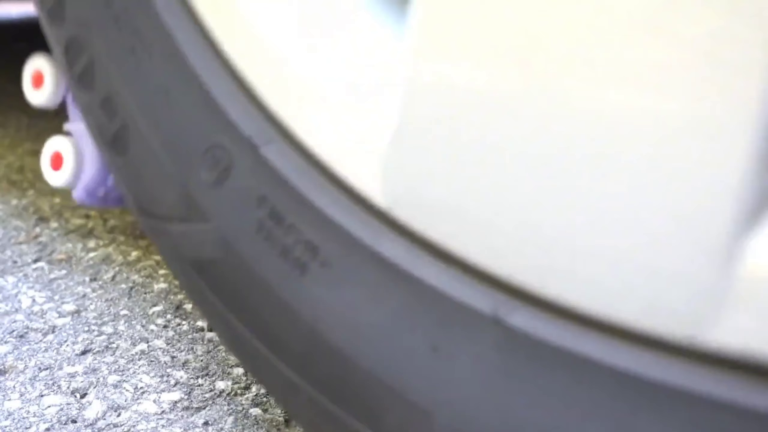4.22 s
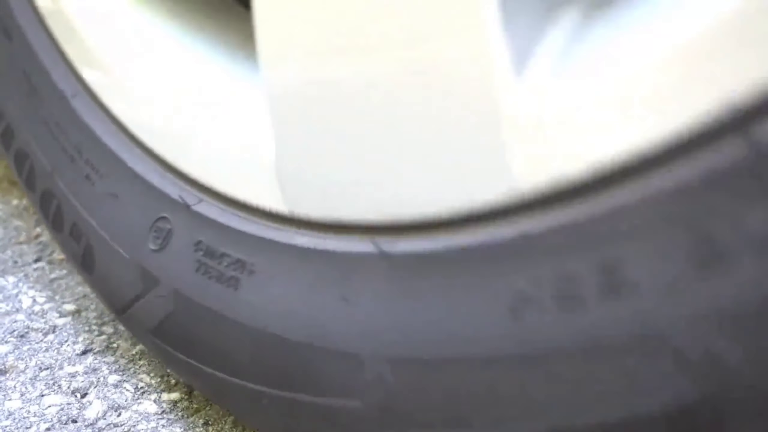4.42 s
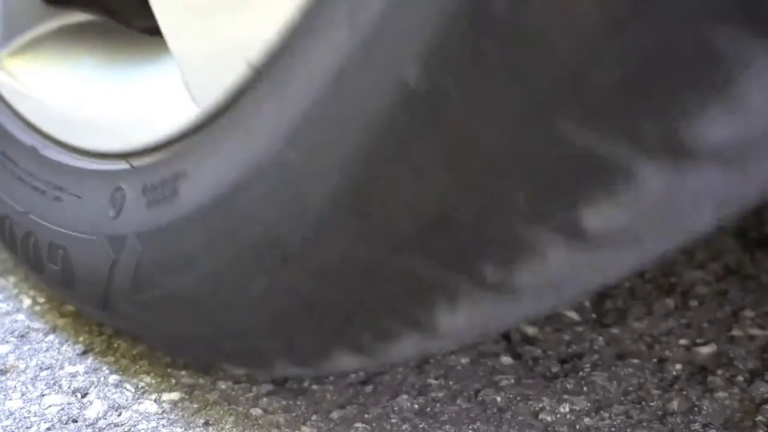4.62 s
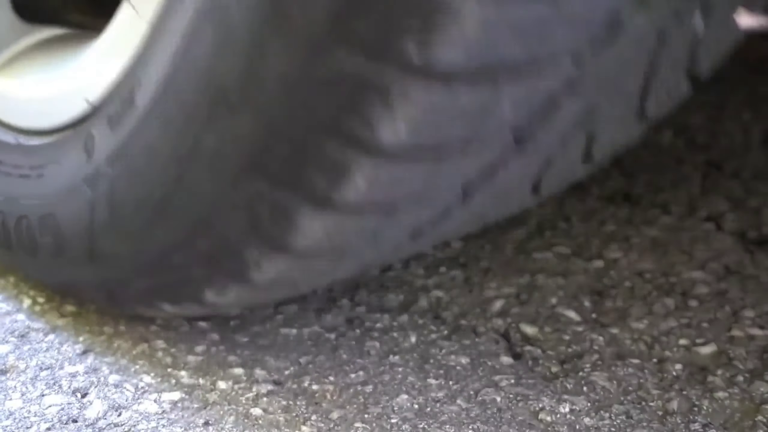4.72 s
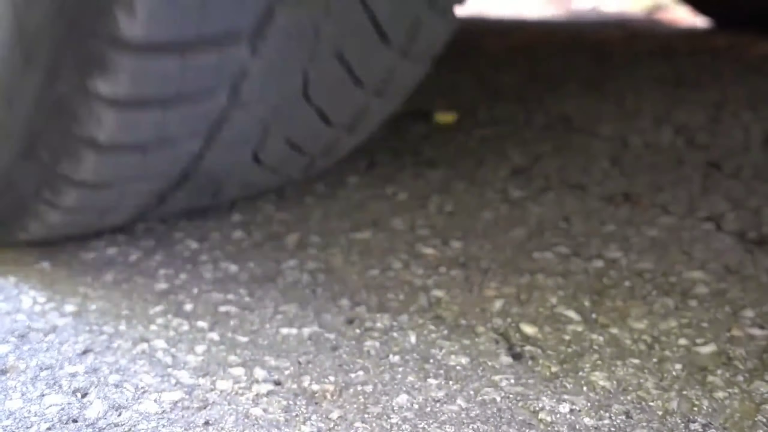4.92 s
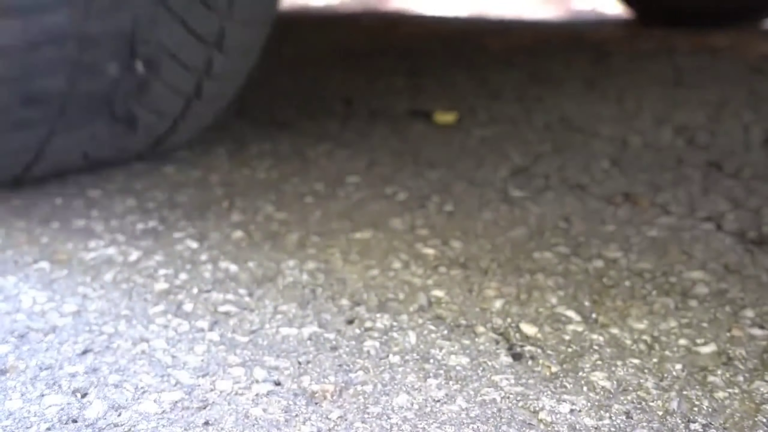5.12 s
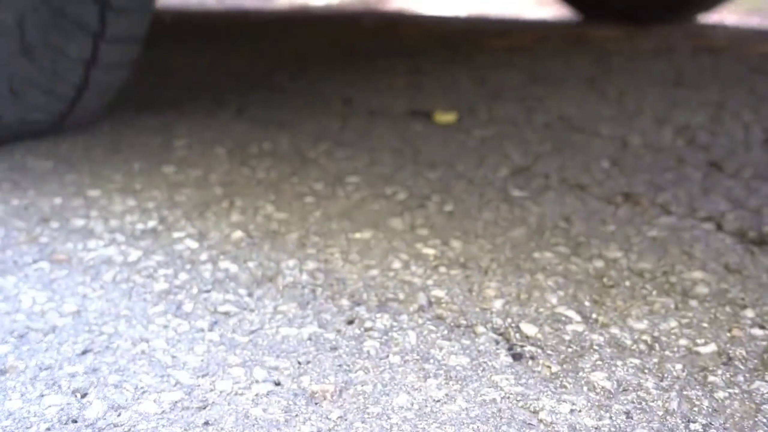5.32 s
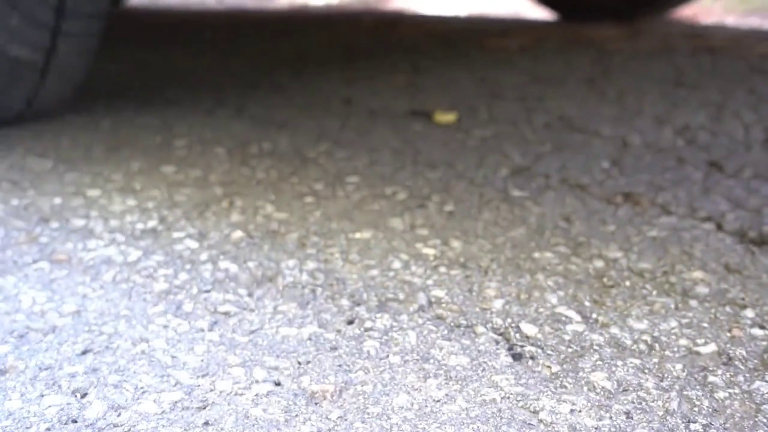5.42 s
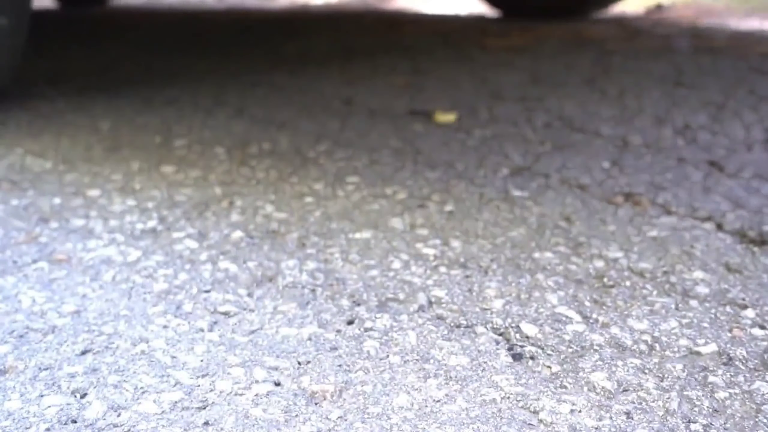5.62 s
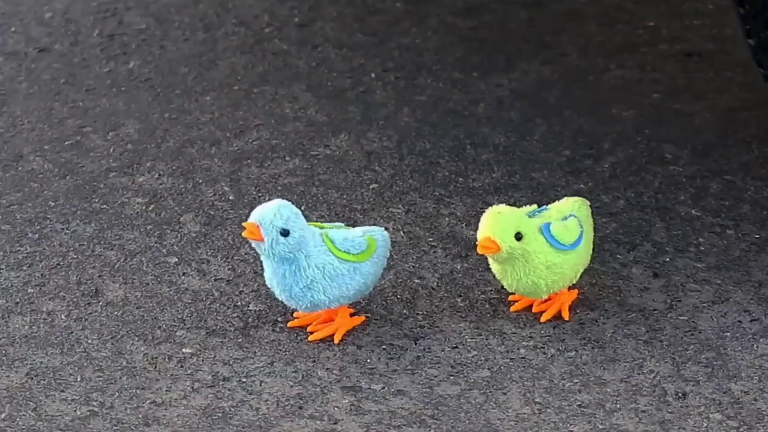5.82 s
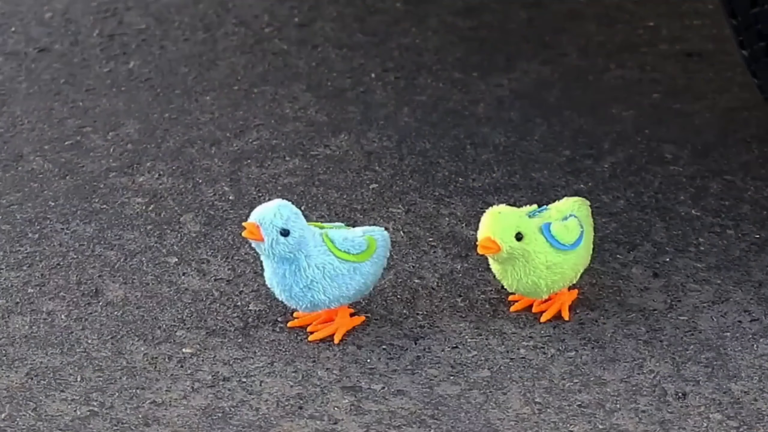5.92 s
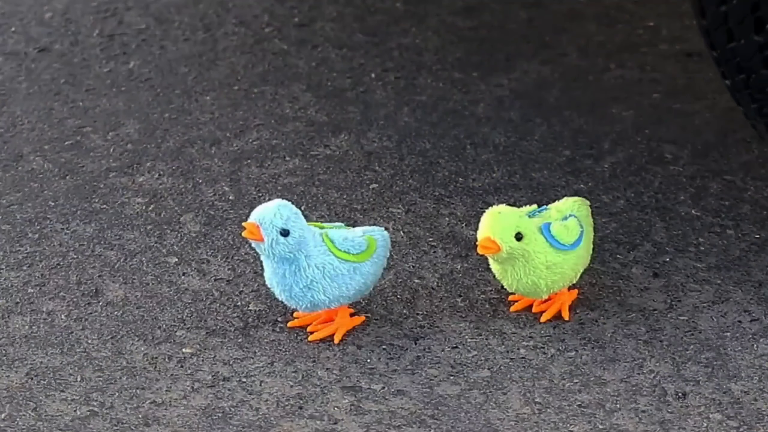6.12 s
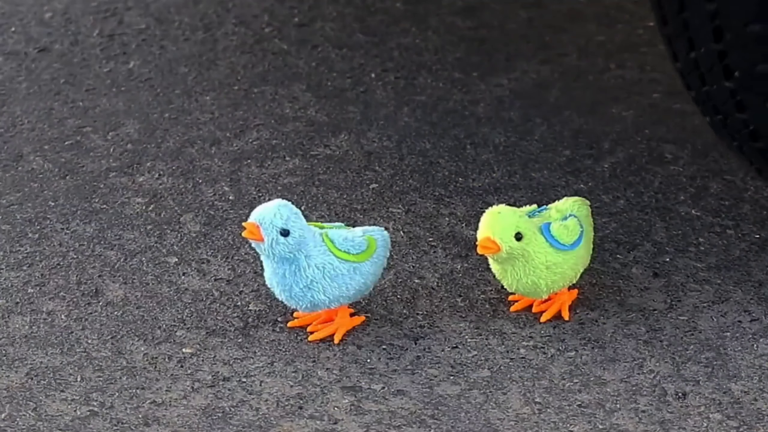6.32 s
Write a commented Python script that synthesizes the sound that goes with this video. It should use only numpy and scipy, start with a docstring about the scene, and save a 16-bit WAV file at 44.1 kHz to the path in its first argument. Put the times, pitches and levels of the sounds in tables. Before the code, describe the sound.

Close to the asphalt, a car idles with a low throb. A tyre squeezes a hard plastic toy: dull knocks, then a dense burst of loud snaps and grinding splinters that thins to stray ticks. After a cut without engine, a second toy breaks in separate crunches, with hollow tyre booms and a final overloaded thump. Brief silence, then faint outdoor air and wind.

```python
"""Car creeping over plastic toys

On asphalt, a close microphone hears a car crush hard plastic toys: four shots in a row, with a short
silence before the last. An idling engine, summed from orders of its firing rate, throbs under the first
two; shaped noise gives air, road, whines, scrapes and wind. Ringing splinters grind, noise-struck pieces
snap, low modes knock in the shell and ring in the jolted tyre; the loudest cracks overload the microphone."""
import sys
import numpy as np
from scipy import signal
from scipy.io import wavfile
from scipy.ndimage import uniform_filter1d, map_coordinates

SR = 44100
rng = np.random.default_rng(int(sys.argv[2]) if len(sys.argv) > 2 else 0)


def volts_from_decibels(level):
    """Turn decibel levels (scalar or array-like) into linear amplitude factors."""
    exponent = np.asarray(level, float) / 20
    return 10 ** exponent


def master(y):
    """Save y as 16-bit WAV."""
    cut = np.clip(np.atleast_2d(y).T, -1, 1)
    pcm = np.round(cut * 32767)  # scale
    wavfile.write(sys.argv[1], SR, pcm.astype(np.int16))


N = 281358
THIRD_SHOT_S, THIRD_SHOT_END_S = 3.43, 5.728


def read_spectrum(points, hz):
    """Reads a spectrum at the given frequencies, interpolating over log frequency."""
    f, value = np.transpose(points)
    return np.interp(np.log(hz + 1), np.log(f + 1), value)


def evened(x):
    """Scales a sound to rms 1."""
    return x / np.sqrt(np.mean(x ** 2) + 1e-20)


def spread(rows):
    """Gives the start time of a curve and its columns, one value a sample."""
    s, *columns = np.transpose(rows)
    t = np.arange(s[0], s[-1], 1 / SR)
    return s[0], [np.interp(t, s, c) for c in columns]


def add(mix, s, sound):
    """Mixes a sound in at s seconds."""
    part = mix[max(round(s * SR), 0):][:len(sound)]
    part += sound[:len(part)]


def band(x, lo_hz, hi_hz):
    """Band-passes a sound."""
    edges_hz = [lo_hz, min(hi_hz, SR / 2 - 1)]
    return signal.sosfilt(signal.butter(2, edges_hz, "bandpass", fs=SR, output="sos"), x)


def drift(size, per_s):
    """Smooth random wandering of about rms 1, with per_s fresh values a second."""
    knots = rng.standard_normal(100)
    return map_coordinates(knots, [np.arange(size) * per_s / SR], order=2, mode="mirror")


def fades(size, s):
    """Fades in and out, each s seconds long."""
    return signal.windows.tukey(size, min(2 * s * SR / size, 1))


# air, machinery and road, one table a shot; it swells as the wheel rolls by: t/s, level at 300-1500 Hz/dB
AIR = [
    [(0.0, -42.5), (0.53, -43)],
    [(0.54, -45), (1.14, -36), (1.6, -36.5), (2.04, -35), (2.61, -39.5), (3.43, -45)],
    [(3.42, -44.5), (4.2, -39.5), (5.2, -41), (5.34, -26), (5.52, -29), (5.58, -20.5), (5.69, -48),
     (5.72, -58)],
    [(5.86, -83.5), (5.9, -70.5), (5.97, -54.5), (6.38, -53)],
]
# their colour, one table a shot: f/Hz, relative density/(dB per Hz)
AIR_COLOUR = [
    [(18, -24), (30, 3), (167, -8), (228, -17.5), (288, -13.5), (978, -36), (1170, -33.5), (1600, -45),
     (2700, -45.5), (11000, -61), (11900, -53), (15000, -62)],
    [(18, -19), (30, -7), (119, -6.5), (176, -12.5), (274, -16.5), (364, -12.5), (415, -23.5), (538, -18.5),
     (1870, -39.5), (2310, -35), (3410, -35.5), (7240, -50.5), (8250, -43.5), (13200, -64.5), (15000, -73)],
    [(18, -32.5), (30, -23), (135, 3.5), (169, -2.5), (253, 1.5), (461, -4.5), (593, -1), (1460, -11),
     (2130, -15), (2410, -14), (9580, -33), (11100, -36.5), (12000, -67), (15600, -87), (22000, -120)],
    [(12, -24), (20, 6.5), (52, -16), (71, -14), (295, -24.5), (603, -19), (896, -26), (1690, -22),
     (2030, -26), (3530, -28), (4030, -35), (5250, -36), (11000, -60), (14300, -106), (22000, -120)],
]


def air(rows, colour):
    """Air, machinery and road noise: random short-time spectra with drifting patches."""
    s, (level_db,) = spread(rows)
    frames, hz = len(level_db) // 256 + 5, np.fft.rfftfreq(1024, 1 / SR)
    real, imaginary, patches = rng.standard_normal((frames, 513, 3)).T
    patches = uniform_filter1d(patches, size=10, axis=0)
    patches = evened(uniform_filter1d(patches, size=10, axis=1))
    colour_db = read_spectrum(colour, hz)[:, None] + 1.6 * patches
    spectra = (real + 1j * imaginary) * volts_from_decibels(colour_db)
    noise = signal.istft(spectra, nperseg=1024, noverlap=768)[1][:len(level_db)]
    return s, volts_from_decibels(level_db) * noise / band(noise, 300, 1500).std() * fades(len(noise), 0.014)


# wind on the microphone, one table a gust: t/s, level/dB
WIND = [
    [(5.28, -62.5), (5.46, -35.5), (5.73, -38.5)],
    [(6.12, -75), (6.22, -53), (6.38, -42.5)],
]


def wind(rows):
    """Wind rumbling on the microphone: lumpy low noise."""
    s, (level_db,) = spread(rows)
    rumble = evened(band(rng.standard_normal(len(level_db)), 5.6, 62.6))
    return s, volts_from_decibels(level_db) * rumble * fades(len(level_db), 0.0061)


# whines, squeaks, scrapes and a scuff: start t/s, end t/s, f/Hz, width/Hz, level/dB
WHINES_AND_SCRAPES = [(3.425, 3.47, 2210, 1580, -42), (0, 0.5553, 283.6, 22.5, -43),
                      (.545, 0.601, 301, 28.5, -42.5), (.55, 3.42, 8250, 300, -62), (.55, 2, 1492, 64, -57),
                      (1.985, 2.07, 3710, 150, -36), (1.984, 2.09, 4630, 960, -35),
                      (2.701, 2.8, 3700, 227, -49), (3.75, 4.15, 1597, 103, -49.5),
                      (3.78, 4.15, 1833, 144, -48.5), (3.8, 4.15, 2116, 67, -47.5),
                      (5.932, 6.38, 1654, 30, -59), (5.93, 6.38, 601, 42, -70)]


def whine_or_scrape(start, end, hz, width_hz, db):
    """Noise in one band: a narrow one whines or squeaks, a wide one scrapes or scuffs."""
    noise = rng.standard_normal(round((end - start) * SR))
    sound = evened(band(noise, hz - width_hz / 2, hz + width_hz / 2))
    return volts_from_decibels(db) * sound * fades(len(noise), 0.015)


# idling engine, one table a shot: t/s, firing rate f/Hz, then the mean level/dB of order 1, of order 3 # and of
# the order that swells on its own
IDLE = [
    [(0.0, 22.34, -22.5, -31.5, -34), (0.05, 23.41, -28, -47.5, -38.5), (0.212, 26.48, -29.5, -36.5, -32.5),
     (0.454, 27.11, -23.5, -49, -35), (0.52, 26.92, -32, -45, -28)],
    [(0.55, 20.2, -41.5, -42.5, -41), (0.76, 20.65, -37, -45.5, -47), (0.93, 22.04, -40.5, -35, -25),
     (1.17, 22.9, -27, -37.5, -22.5), (1.35, 22.73, -22.5, -24, -30), (1.44, 22.93, -20, -32, -20),
     (1.74, 23.2, -27.5, -28, -30), (2.35, 23.24, -19.5, -29.5, -27), (2.72, 23.28, -24.5, -31, -36),
     (3.28, 22.7, -25, -39, -26.5), (3.42, 22.2, -31, -47.5, -30.5)],
]
# all orders, one table a shot: multiple of the firing rate, level/dB against 2 dB under the mean of
# the three levels above (not used for those three orders)
ORDERS_DB = [
    [(1, 0), (2, -22), (3, -5), (4, -1), (5, -9), (6, -7), (7, -4.5), (8, -34), (9, -40.5), (10, -24),
     (11, -30), (12, -15.5), (13, -30), (14, -29)],
    [(1, 0), (2, -4.5), (3, -13), (4, -7), (5, -6), (6, -19.5), (7, -16), (8, -10.5), (9, -29.5),
     (10, -16.5), (11, -28.5), (12, -40), (13, -39), (14, -19.5), (15, -41), (16, -17.5)],
]
# the three orders that have their own levels, one row a shot: multiples of the firing rate
LEAD_ORDERS = [(1, 3, 6), (1, 3, 5)]


def engine(rows, orders, leads):
    """Orders of the firing rate, nearly in step, so each firing is a sharp drop; each order wavers."""
    s, (firing_hz, *lead_db) = spread(rows)
    size = len(firing_hz)
    turns, out = np.cumsum(firing_hz) / SR, 0
    body_db = np.mean(lead_db, 0) - 2.0
    for k, db in orders:
        k = round(k)
        if k in leads:
            level_db = lead_db[leads.index(k)] + 1.6 * drift(size, per_s=8)
        else:
            level_db = body_db + db + 0.83 * drift(size, per_s=7.4)
        phase = 2 * np.pi * k * turns + 0.38 * drift(size, per_s=7.1)
        out = out - np.sqrt(2) * volts_from_decibels(level_db) * np.sin(phase)
    return s, out * fades(size, 0.00178)


def boom(db, hz, t60, rise, overtone_db, rough, puff_db):
    """A mode that swells and dies unevenly, with a weak unrelated partner and a dull puff at its start."""
    t = np.arange(round(0.45 * SR)) / SR
    t60 = max(t60, 0.005)
    onset = 1 - np.exp(-t / max(rise, 1e-4))
    modes = np.sin(2 * np.pi * hz * t + rough * drift(len(t), per_s=80))
    modes += volts_from_decibels(overtone_db) * np.sin(2 * np.pi * 1.47 * hz * t)
    tone = volts_from_decibels(db - 60 * t / t60) * onset * modes * (1 + rough * drift(len(t), per_s=80))
    puff = evened(band(rng.standard_normal(len(t)), hz / 1.8, hz * 2.5))
    puff *= volts_from_decibels(db + puff_db - 60 * t / (0.25 * t60 + 0.02)) * onset
    return band(tone + puff, hz / 4.47, hz * 2.42)


# jolts that ring the air in the tyre: t/s, level before rise and decay/dB, f/Hz, t60/s, rise/s
JOLTS = [(4.157, -21, 219.1, 0.306, 0.0324), (4.364, -7.5, 177.8, 0.225, 0.0038),
         (4.768, -19, 185.6, 0.108, 0.013), (5.282, -20, 160.2, 0.29, 0.016),
         (5.336, -1.5, 123, 0.143, 0.018), (5.432, 2.5, 160, 0.0315, 0.009),
         (5.548, -7.5, 235, 0.084, 0.0052), (5.583, -10, 226.1, 0.455, 0.0118)]


def jolt(db, hz, t60, rise):
    """The air in the tyre booms hollow after a jolt."""
    return boom(db, hz, t60, rise, overtone_db=-15.0, rough=0.248, puff_db=-8.5)


def ground(x):
    """Reflections between the road and the underside of the car: sparse, dying random echoes."""
    t = np.arange(round(0.15 * SR)) / SR
    taps = (rng.random(len(t)) < 0.05) * rng.standard_normal(len(t))
    taps *= volts_from_decibels(-60 * t / 0.11) * (t > 0.002)
    return signal.oaconvolve(x, taps / np.linalg.norm(taps))[:N]


# knocks: the shell buckles, and higher modes ring in the jolted tyre:
# t/s, level before rise and decay/dB, f/Hz, t60/s
KNOCKS = [(1.398, -3, 648, 0.052), (1.404, 3.5, 387, 0.0225), (1.452, 11, 293, 0.0198),
          (1.486, 4, 628, 0.0156), (1.524, 6, 455, 0.014), (1.555, 5, 700, 0.0077), (1.68, -5, 999, 0.026),
          (4.164, -8, 243.6, 0.048), (4.364, -4.5, 694, 0.0333), (4.404, -9.5, 246.7, 0.0436),
          (5.549, -17, 978, 0.107), (5.574, -21, 900.3, 0.35), (5.574, -23, 440.6, 0.298)]


def knock(db, hz, t60):
    """A quick-rising knock: the shell buckling, or a higher mode ringing in the jolted tyre."""
    return boom(db, hz, t60, rise=0.0012, overtone_db=-12.5, rough=0.25, puff_db=-11.5)


# snapping plastic: t/s, peak level/dB, ring f/Hz, treble level against the ring/dB, ring t60/s
SNAPS = [(1.4496, -16.5, 1050, -30, 0.026), (1.4724, -16.5, 1160, -31, 0.039),
         (1.5274, 0.5, 2417, -24.5, 0.0196), (1.5504, -7, 2480, -4, 0.098), (1.6843, -1.5, 1838, -8, 0.054),
         (1.71, 1, 2850, -15, 0.029), (1.7255, -4.5, 3150, -15.5, 0.064),
         (1.7515, 0.5, 3009, -24.5, 0.0284), (1.7624, -9, 2930, -17, 0.035), (1.7742, -4, 2970, -21, 0.026),
         (1.7843, -8, 3100, -19, 0.033), (1.8084, -8.5, 2680, -7, 0.042), (1.8204, -8, 4230, -23, 0.023),
         (1.8451, -0.5, 2780, -21.5, 0.02), (1.8612, -6.5, 2996, -20, 0.031),
         (1.8748, -7.5, 3840, -27.5, 0.027), (1.9883, -16.5, 3670, -25, 0.0565),
         (2.0612, -21, 1553, -19.5, 0.06), (2.2832, -26, 1103, -21, 0.103), (2.3144, -21, 3100, -1, 0.058),
         (2.4331, -27.5, 3140, -11.5, 0.04), (2.4833, -28, 1160, -3.5, 0.04),
         (3.1343, -35.5, 2355, -24, 0.043), (3.4264, -33, 1162, -27, 0.047), (3.5082, -30, 2010, -35, 0.04),
         (3.637, -30, 1837, -25.5, 0.037), (4.156, -18, 2670, -7, 0.035), (4.1684, -10, 2730, 2.5, 0.117),
         (4.1912, -4, 1377, -8, 0.05), (4.2134, -8, 1394, -4, 0.0485), (4.2432, -22, 1380, -25, 0.04),
         (4.3061, -7.5, 1508, 3.5, 0.076), (4.3636, -10.5, 1880, 11, 0.062), (4.4051, -6, 1191, -8, 0.061),
         (4.4434, -16, 1260, -21, 0.042), (4.4788, -6.5, 1360, -27.5, 0.058),
         (4.5159, -15, 1755, -18.5, 0.034), (4.585, -4.5, 1930, -16.5, 0.0464),
         (4.6156, -13, 1880, -23.5, 0.079), (4.6634, -12, 2057, -27, 0.0486),
         (4.7569, -10.5, 2550, -22, 0.047), (4.7734, -7, 2670, -26, 0.043), (4.817, -9, 1200, -21.5, 0.026),
         (4.851, -9, 3550, -31, 0.0466), (4.8788, -10.5, 1800, -24, 0.0397),
         (4.9191, -16, 1260, -33, 0.0376), (4.9421, -10, 2150, -40.5, 0.049),
         (4.9926, -12.5, 2340, -34.5, 0.055), (5.0577, -14, 1756, -20, 0.055),
         (5.0853, -14, 1800, -23.5, 0.084), (5.114, -5.5, 1990, -26, 0.041),
         (5.1709, -6.5, 2050, -25.5, 0.04), (5.1746, -5, 2010, -28.5, 0.0404),
         (5.215, -5, 1285, -29, 0.0535), (5.2664, -9.5, 1290, -30, 0.058), (5.2848, -6, 1340, -24, 0.034),
         (5.33, -9, 2520, -14, 0.091), (5.3532, -6.5, 3620, -8, 0.042), (5.3832, -6.5, 3130, -15, 0.034),
         (5.4392, -15.5, 2230, -16, 0.05), (5.483, -5.5, 2834, -11.5, 0.063),
         (5.5354, -9.5, 3400, -12.5, 0.054), (5.5487, -4, 964, -17, 0.035), (5.6321, -10, 3890, -22, 0.025),
         (5.6466, -10, 4060, -16.5, 0.037), (5.686, -10, 2170, -15.5, 0.0234),
         (5.7137, -11.5, 3940, -16.5, 0.035)]


def snap(db, hz, treble_db, t60, noise, top_hz):
    """A sudden crack: a hard first tick and a dying rattle ring the broken piece, with a shorter spray."""
    t = np.arange(len(noise)) / SR
    t60 = max(t60, 0.005)
    rattle = (noise + 5.0 * (t == 0)) * volts_from_decibels(-60 * t / t60)
    ring = evened(band(rattle, hz / 1.2686, hz * 1.1667))
    body = evened(band(rattle, 620, 3930))
    spray = band(rattle * volts_from_decibels(-10 * t / t60), 4400, top_hz)
    spray = evened(band(spray, 2300, top_hz))
    crack = ring + 0.896 * body + volts_from_decibels(treble_db) * spray
    return volts_from_decibels(db) * crack / abs(crack).max()


# the second toy gives way in separate crunches: start t/s, length/s, level/dB, change to the end/dB,
# fine grit against that level/dB
CRUNCHES = [(4.155, 0.168, -20, -23.5, -13.5), (4.302, 0.0623, -25, -6, -5.5),
            (4.362, 0.2182, -23, -13.5, -11), (4.579, 0.185, -29, -20, -31),
            (4.755, 0.1625, -16.5, -15.5, -9.5), (4.916, 0.1904, -25.5, -1, -14.5),
            (5.11, 0.0488, -15, -25.5, -12), (5.164, 0.16, -26, -2, -9.5), (5.28, 0.2585, -20, -3, 0),
            (5.541, 0.098, -29, -17, 10), (5.631, 0.0958, -29, -2.5, 2.5)]


def crunch(start, length, db, change_db, grit_db):
    """The curve of one crunch, for grind(): a quick rise, a sagging hold, a slide to the end."""
    knee, sag = 0.434, 0.275  # at this share of the length, this share of the change is done
    steps = [(0, -14), (0.004, 0), (knee * length, sag * change_db), (length, change_db)]  # t/s, level/dB
    shell_hz = 1800
    return [(start + s, db + step_db, grit_db, shell_hz) for s, step_db in steps]


# the first toy grinds down in one go: t/s, level of middling splinters/dB, fine grit against it/dB,
# shell pitch f/Hz
GRIND_DOWN = [(1.44, -38, -2.5, 1200), (1.514, -39, -0.5, 2340), (1.527, -17.5, -4, 2600),
              (1.61, -23.5, -5, 1810), (1.722, -14, -3, 3144), (1.81, -25.5, 8.5, 3300),
              (1.872, -19, -0.5, 3420), (1.936, -37, -3, 3546), (2.086, -36.5, -5, 2127),
              (2.2, -51.5, 1, 2260), (2.6, -56, -1.5, 2000)]
# colour of the splinters, one table a toy: f/Hz, relative density/(dB per Hz)
GRIND_COLOUR = [
    [(290, -29.5), (500, -3), (629, -4), (886, -6), (1130, -1), (1570, -6.5), (1790, -5.5), (1950, -10.5),
     (3260, -5.5), (3760, -8.5), (6470, -6.5), (7460, -19), (8370, -10), (13800, -30.5), (15300, -28)],
    [(290, -15), (500, -11.5), (809, -4.5), (1190, 13.5), (1620, -2), (1950, 2), (2730, 4.5), (3860, 1.5),
     (6420, -7), (7540, -6), (10300, -14), (11400, -48), (12200, 6), (15900, -61.5), (22000, -120)],
]
# large pieces thin out as the grit grows, one row a toy: level against middling splinters at 0 dB of
# grit/dB, loss per dB of grit/dB
LARGE = [(-17, 3.5), (-9.5, 0.3532)]


def grind(rows, colour, large, per_s, uneven_db, cycles, shell_db):
    """Fractures come in clumps; each rings splinters of many sizes, boosted near the whole shell's pitch."""
    s, (mid_db, grit_db, shell_hz) = spread(rows)
    large_db = large[0] - large[1] * grit_db
    size, t = len(mid_db), np.arange(1500) / SR
    strength = volts_from_decibels(uneven_db * np.minimum(rng.exponential(1, size), 3))
    breaks = (rng.random(size) < per_s / SR) * strength
    # each break sets off a clump of ticks that thins with a 2.5 ms time constant
    clumps = 0.45 + evened(signal.lfilter([1], [1, -np.exp(-1 / (0.0025 * SR))], breaks))
    pieces = np.zeros((3, size))  # large, middling, fine
    for hz in np.geomspace(colour[0][0], colour[-1][0], num=48):
        ring = np.exp(-t * hz / cycles) * np.sin(2 * np.pi * hz * t)
        ring *= volts_from_decibels(read_spectrum(colour, hz)) * np.sqrt(hz) / np.linalg.norm(ring)
        near_shell = volts_from_decibels(shell_db * np.exp(-(np.log(hz / shell_hz) / 0.14) ** 2))
        ticks = (rng.random(size) < 0.015) * rng.standard_normal(size) * clumps * near_shell
        pieces[np.searchsorted((1500, 4500), hz)] += signal.oaconvolve(ticks, ring)[:size]
    levels_db = (mid_db + large_db, mid_db, mid_db + grit_db)
    total = sum(volts_from_decibels(db) * evened(p) for db, p in zip(levels_db, pieces))
    return s, total * fades(size, 0.0027)


def scene():
    """All four shots at the microphone: the surroundings, then the toys and the tyre."""
    surroundings, toys = np.zeros((2, N))
    for shot in zip(AIR, AIR_COLOUR):
        add(surroundings, *air(*shot))
    for rows in WIND:
        add(surroundings, *wind(rows))
    for row in WHINES_AND_SCRAPES:
        add(surroundings, row[0], whine_or_scrape(*row))
    for shot in zip(IDLE, ORDERS_DB, LEAD_ORDERS):
        add(surroundings, *engine(*shot))
    for s, *row in KNOCKS:
        add(toys, s, knock(*row))
    for (s, *row), noise in zip(SNAPS, rng.standard_normal((len(SNAPS), 5000))):
        add(toys, s, snap(*row, noise, top_hz=9500 if s > THIRD_SHOT_S else 11500))
    add(toys, *grind(GRIND_DOWN, GRIND_COLOUR[0], LARGE[0],
                     per_s=680, uneven_db=-0.5, cycles=3.8, shell_db=8.0))
    for row in CRUNCHES:
        add(toys, *grind(crunch(*row), GRIND_COLOUR[1], LARGE[1],
                         per_s=330, uneven_db=-4.5, cycles=3.87, shell_db=5))
    toys = toys + volts_from_decibels(-8.5) * ground(toys)
    for s, *row in JOLTS:
        add(toys, s, jolt(*row))
    # toys and tyre stop with the third shot, in a 6 ms fade
    toys *= np.clip((THIRD_SHOT_END_S - np.arange(N) / SR) / 0.006, 0, 1)
    return (surroundings + toys)[None]


def top_cut(x):
    """Nothing passes above the cut-off."""
    return signal.sosfilt(signal.butter(12, 15410, fs=SR, output="sos"), x)


def record(dry):
    """The microphone input overloads near full scale; from the third shot on the treble ends lower."""
    overloaded = np.clip(dry, -0.98, 0.98)
    full, dull = (signal.oaconvolve(overloaded, signal.firwin(301, top_hz, fs=SR)[None], "same")
                  for top_hz in (15300, 11500))
    mix = np.where(np.arange(N) < THIRD_SHOT_S * SR, full, dull)
    return top_cut(mix)


dry = scene()
out = record(dry)
master(out)
```